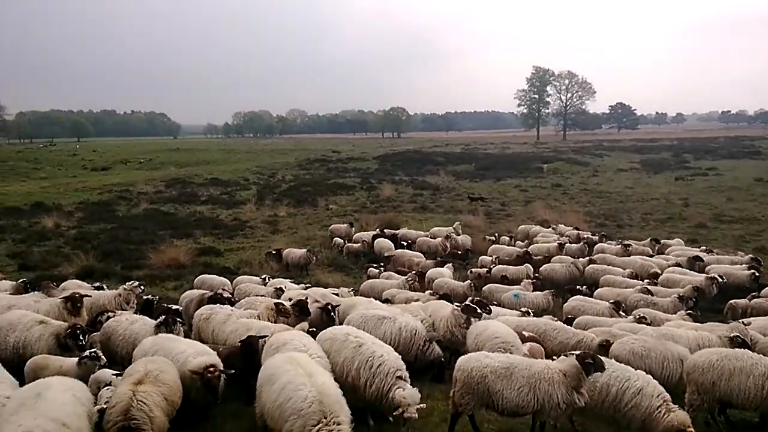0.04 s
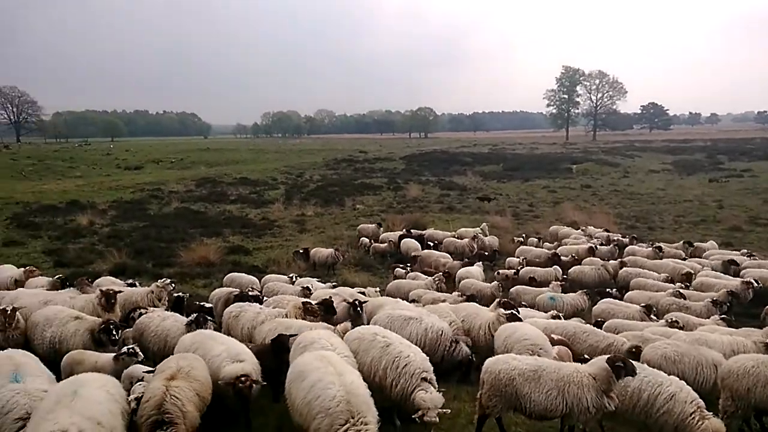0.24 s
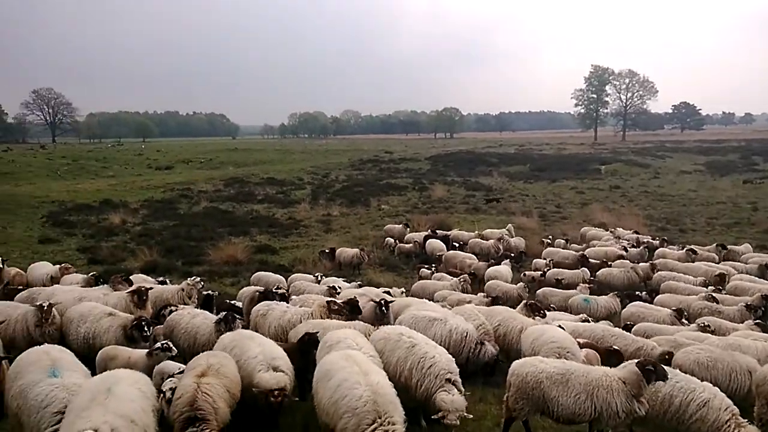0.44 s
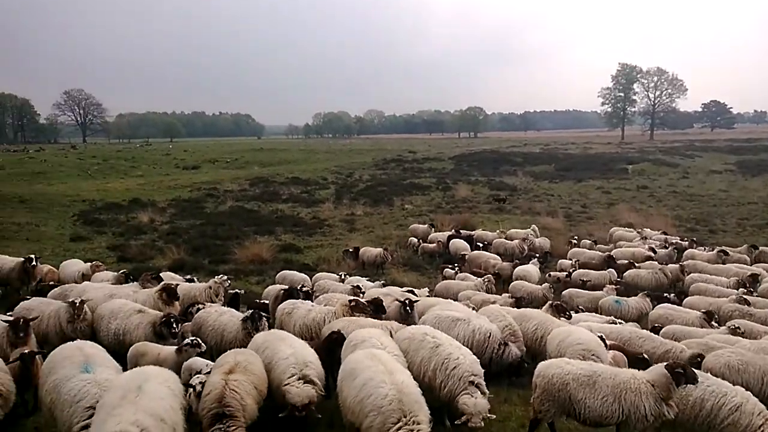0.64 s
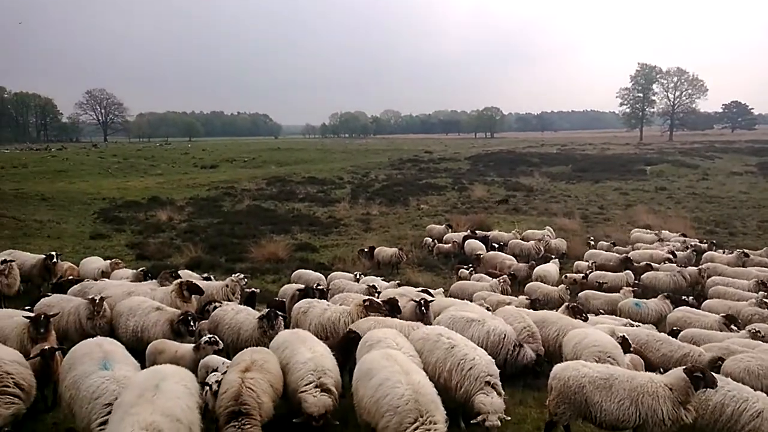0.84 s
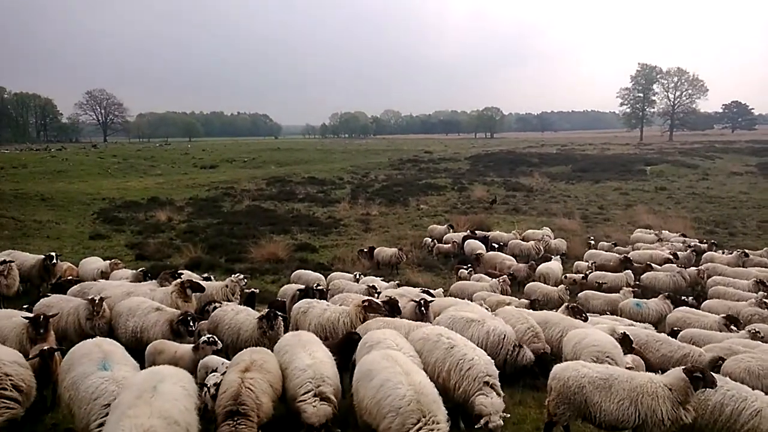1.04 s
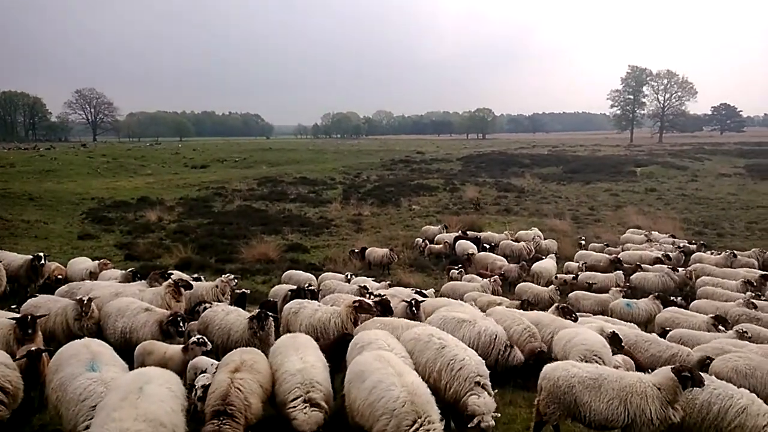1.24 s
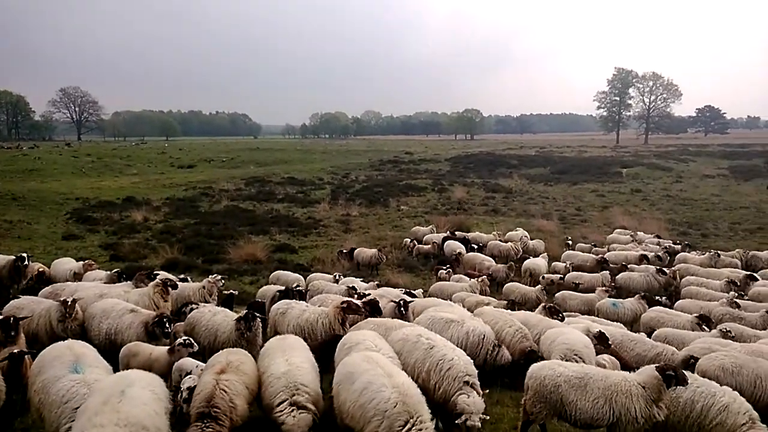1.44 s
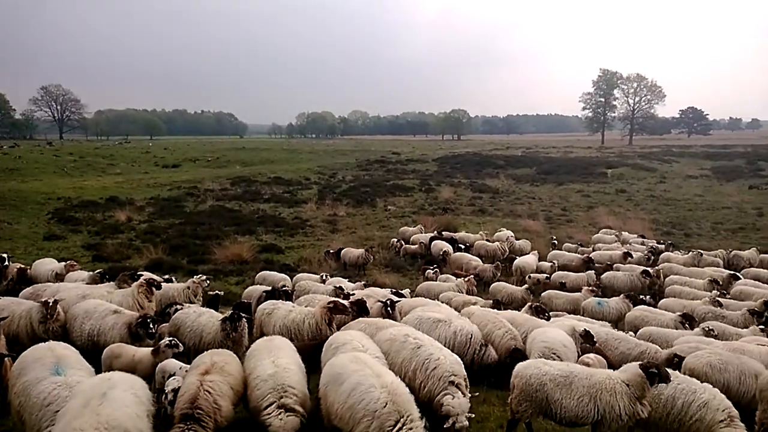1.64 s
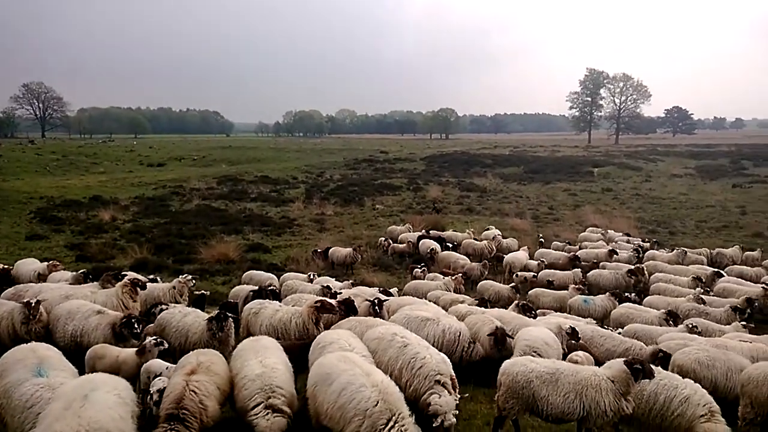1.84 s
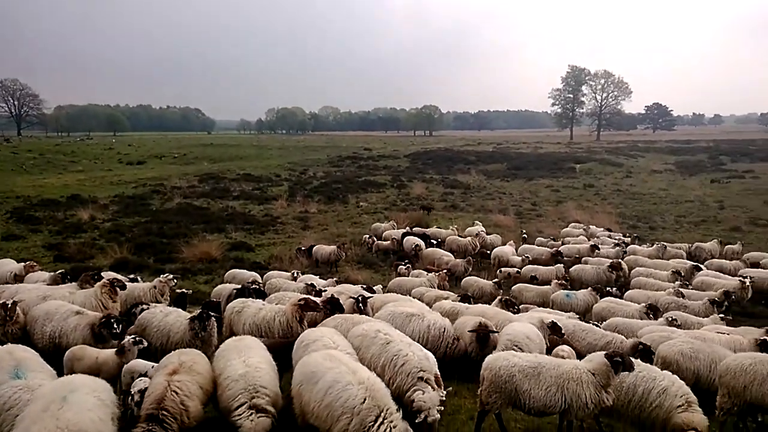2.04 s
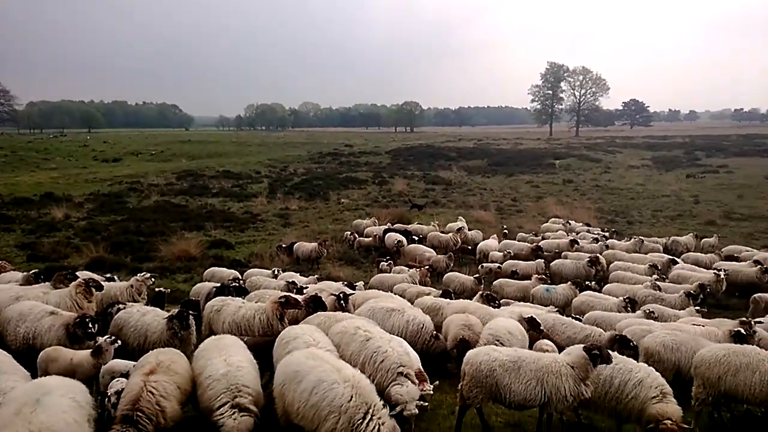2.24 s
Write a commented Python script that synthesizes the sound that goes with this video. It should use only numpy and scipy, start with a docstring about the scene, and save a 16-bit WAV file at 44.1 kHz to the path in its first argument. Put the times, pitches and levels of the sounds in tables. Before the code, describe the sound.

A ewe and two lambs bleat over buffeting wind and faint birdsong.

```python
"""Wind rumbles and buffets the microphone on open grassland, while a small bird nearby repeats a
rising, warbling, falling phrase and others whistle further off. Then a ewe close by bleats in quick,
hoarse throbs, and two lambs hold clear, overlapping calls. Each sheep's voice is a row of harmonics
shaped by its throat; glottal snaps and puffs of air make the ewe rasp. Behind them lie faint bleats,
the blur of the distant flock and rustling grass."""
import sys
import numpy as np
from scipy import signal
from scipy.fft import rfft, irfft
from scipy.io import wavfile
from scipy.ndimage import uniform_filter1d

SR = 44100
rng = np.random.default_rng(int(sys.argv[2]) if len(sys.argv) > 2 else 0)


def bounce(signal):
    """Save signal as a 16-bit WAV file at the path given by the first command-line argument."""
    frames = np.transpose(np.atleast_2d(signal))
    limited = np.clip(frames, -1, 1)
    pcm = np.round(limited * 32767).astype(np.int16)
    wavfile.write(sys.argv[1], SR, pcm)


N = 101429
T = np.arange(N) / SR

# throbs of the near ewe (centre [s], length [s], pitch [Hz], voice level [dB], rasp level [dB])
EWE_THROBS = [(0.744, 0.033, 140, -84, -62), (0.819, 0.057, 145.3, -74, -55.5),
              (0.904, 0.029, 150.2, -49.5, -58), (0.945, 0.043, 149.3, -36, -44.5),
              (0.975, 0.024, 145.9, -36, -47.5), (1.038, 0.054, 149.6, -33, -43.5),
              (1.114, 0.049, 162.9, -36.5, -41), (1.195, .05, 161.2, -38, -41),
              (1.278, 0.0413, 156.2, -34, -41.5), (1.356, 0.039, 157.1, -34.5, -43),
              (1.442, 0.053, 152.1, -42, -43), (1.524, 0.043, 166.5, -46, -47.5),
              (1.593, .03, 160.3, -53, -61)]
# her throat, for the voiced tone and for the rasp (frequency [Hz], gain [dB])
EWE_VOICE_THROAT = [(150, -31), (320, -26), (470, -20.5), (580, 4.5), (660, 8), (770, -33), (950, -49),
                    (1300, -8.5), (1700, -28), (3000, -44)]
EWE_RASP_THROAT = [(300, -25.5), (600, 13.5), (850, 1.5), (1150, 0.5), (1400, 12), (1650, -4.5),
                   (2100, 2.5), (2650, -2.5), (3300, -19), (4600, -21.5), (6500, -40.5), (15000, -42)]
# the lambs' calls (time [s], pitch [Hz], level [dB])
FIRST_LAMB_CALL = [(.845, 355, -57.5), (.875, 389.3, -43.5), (.92, 408.5, -44.5), (.96, 430.7, -46.5),
                   (1.1, 449.6, -46), (1.35, 445.6, -46.5), (1.48, 434.8, -48.5), (1.59, 416, -44.5),
                   (1.665, 394, -44.5), (1.73, 379.6, -46.5), (1.755, 370, -57)]
SECOND_LAMB_CALL = [(1.19, 337.6, -66.5), (1.24, 334.1, -51.5), (1.41, 342.5, -46.5), (1.5, 346.8, -46),
                    (1.6, 360.4, -45.5), (1.7, 356.6, -44.5), (1.84, 351.4, -45), (1.925, 359.7, -45),
                    (2.06, 351.3, -45.5), (2.15, 347.3, -46.5), (2.3, 339, -48)]
# their throats and the air in their voices (frequency [Hz], gain [dB])
FIRST_LAMB_THROAT = [(400, -27), (880, -10.5), (1100, 14), (1380, 1.5), (1650, -17.5), (2200, -18.5),
                     (2900, -13), (3400, -38.5), (4300, -38), (6000, -37)]
SECOND_LAMB_THROAT = [(350, -22.5), (700, -3.5), (1060, 3), (1410, -3.5), (1770, 3.5), (2120, -3.5),
                      (2480, -15.5), (2900, -33.5), (3500, -24), (4250, -18.5), (4700, -24.5), (6000, -35)]
BREATH_COLOUR = [(500, -12), (1100, 1), (1800, 1), (2600, -11), (4000, -8), (7000, -22)]
# the near bird (top of rise [s], rise length [s], start pitch [Hz], rise level [dB], warble length [s],
# warble against rise [dB], wait from top to mid-fall [s], fall length [s], fall level [dB])
BIRD_PHRASES = [(-.08, 0.037, 4850, -62, .06, -5, 0.13, 0.079, -65.5),
                (0.197, .042, 4800, -62, 0.069, -2, 0.12, 0.12, -58.5),
                (0.466, 0.042, 4700, -55, 0.061, -5, 0.093, 0.1, -59.5),
                (.716, 0.057, 4610, -55.5, 0.067, -6.5, 0.085, 0.08, -60),
                (0.977, 0.087, 4230, -56.5, 0.06, -8.5, 0.078, .075, -61.5),
                (1.227, 0.081, 4260, -56.5, 0.045, -9, 0.078, 0.068, -63),
                (1.471, .068, 4270, -56, 0.052, -10.5, 0.085, 0.069, -61),
                (1.721, 0.094, 4120, -58, 0.064, -12.5, .076, 0.054, -58.5),
                (1.978, 0.063, 4220, -59.5, 0.058, -5, 0.076, .08, -63)]
# birds further off (start [s], length [s], first pitch [Hz], middle [Hz], last [Hz], level [dB])
FAR_WHISTLES = [(-.03, 0.056, 3300, 3186, 3060, -56), (0.09, 0.15, 3580, 3730, 3540, -76),
                (0.179, .065, 2500, 2430, 2260, -71), (0.28, 0.058, 3380, 3250, 3083, -63.5),
                (0.321, 0.13, 3520, 3720, 3830, -75), (0.494, 0.13, 3540, 3680, 3800, -70.5),
                (0.742, .08, 3150, 3630, 4960, -71), (2.215, 0.038, 4300, 3610, 3010, -71),
                (2.18, 0.19, 4450, 4430, 4380, -75)]
# wind at the microphone (time [s], level [dB])
WIND_LEVEL = [(0, -46.5), (.04, -32.5), (.1, -45), (.2, -35.5), (.3, -28.5), (.38, -29), (.45, -29.5),
              (.55, -30), (.68, -28.5), (.77, -35.5), (.92, -31), (1.05, -26), (1.14, -32), (1.33, -36.5),
              (1.44, -29.5), (1.57, -32.5), (1.66, -40.5), (1.78, -34.5), (1.93, -39), (2.07, -37.5),
              (2.16, -44.5), (2.23, -56), (2.3, -61)]
# eddies striking it (time [s], length [s], level [dB], tilt from 50 to 800 Hz [dB/octave])
WIND_BUFFETS = [(0.237, 0.011, -18, 5.5), (0.256, 0.014, -18, 1.5), (0.271, 0.0057, -17, 2),
                (0.29, 0.028, -13.5, -0.5), (0.308, 0.029, -11.5, 1), (0.343, 0.02, -23, 2.5),
                (0.403, 0.0084, -16.5, 1.5), (0.489, 0.02, -12.5, -6.5), (0.514, 0.015, -25.5, 1),
                (0.543, 0.011, -12.5, 2.5), (0.565, 0.02, -16, -6), (.633, 0.0058, -12, -12.5),
                (1.165, 0.0127, -20.5, -5.5), (1.726, 0.016, -23, 3), (1.789, 0.041, -27.5, 0.5),
                (1.86, 0.019, -39.5, 2.5), (1.967, 0.017, -29.5, -2), (2.021, .016, -14.5, -0.5),
                (2.051, 0.041, -26.5, -4)]
# colours of the rumble and of a buffet (frequency [Hz], gain [dB])
RUMBLE_COLOUR = [(20, -5), (45, -1.5), (80, 5), (110, -4.5), (160, -13.5), (250, -25.5), (400, -43.5),
                 (800, -56.5), (2000, -68.5)]
BUFFET_COLOUR = [(20, -16), (45, 3.5), (80, 4), (130, -3.5), (200, -9), (320, -19.5), (500, -36.5),
                 (800, -57), (1500, -75), (4000, -98)]
# sheep further back (centre [s], length [s], pitch [Hz], level [dB])
FAR_SHEEP_BLEATS = [(0.1495, 0.3, 338, -61.5), (.885, 0.0317, 462, -51.5), (.79, .09, 340, -71)]
# their throat (frequency [Hz], gain [dB])
FAR_SHEEP_THROAT = [(300, -13.5), (470, -5), (680, -12.5), (900, 0.5), (1050, 1.5), (1350, -15),
                    (2000, -13.5), (2600, -16), (4000, -26)]
# blur of the distant flock (time [s], level [dB])
FLOCK_LEVEL = [(0, -59), (.25, -63), (.36, -67), (.65, -69.5), (.85, -61.5), (1.5, -65.5), (2.1, -60.5),
               (2.3, -61.5)]
# grass stirring under the flock (centre [s], length [s], level [dB])
GRASS_RUSTLES = [(1.03, 0.14, -63.5), (.435, .03, -67)]
# colours of the flock, the grass and the background hiss (frequency [Hz], gain [dB])
FLOCK_BLUR_COLOUR = [(300, 5), (600, 2), (820, -2.5), (1020, 1.5), (1300, -8.5), (1900, -3.5), (2600, -6.5),
                     (3100, -10.5), (4200, -13.5), (6500, -18)]
GRASS_COLOUR = [(1000, 3), (5000, 2), (9000, -5), (12000, -5), (15500, -2)]
HISS_COLOUR = [(100, 14), (400, -1), (1000, -20), (3000, 3), (5000, 8.5), (7000, -17), (15000, 5.5)]


def ewe():
    """Close by, a low voice arches in pitch with each throb; glottal snaps and puffs of air rasp in it."""
    centres, lengths, hz, voice_db, rasp_db = np.array(EWE_THROBS).T
    sag, jitter, linger_s, puff_decay_cycles = .05, .0125, .054, .58

    def effort(levels_db, linger_db, widths, edge):
        """The throbs, with a little sound lingering between them."""
        throbs = [undb(db) * np.maximum(swell(s, w, edge), undb(linger_db) * swell(s, w + linger_s, edge))
                  for s, w, db in zip(centres, widths, levels_db)]
        return np.max(throbs, axis=0)

    arch = np.max([swell(s, length) for s, length in zip(centres, lengths)], axis=0)
    pitch = np.interp(T, centres, hz) * (1 - sag * (1 - arch)) * (1 + jitter * waver(199))
    tone, cycles = voice(pitch, EWE_VOICE_THROAT, count=11)
    snaps = np.diff(np.floor(cycles), prepend=0) * undb(3 * waver(270))  # one a cycle, uneven
    puffs = rng.standard_normal(N) * np.exp(-(cycles % 1) / puff_decay_cycles)
    rasp = colour(scatter(unit(snaps) + .5 * unit(puffs), wet_db=0, t60=.036), EWE_RASP_THROAT)
    tone *= effort(voice_db, linger_db=-13, widths=lengths, edge=8.3)
    rasp *= effort(rasp_db, linger_db=-11.5, widths=lengths * 1.01, edge=2.2)  # swells more gently
    return tone + rasp


def lamb(call, throat, shimmer_db, jitter):
    """A clear, held call with a little air in it, dulled at the end as the mouth closes."""
    times, hz, db = np.array(call).T
    closing_s, breath_db = .22, -22.5
    pitch = uniform_filter1d(np.interp(T, times, hz), SR // 40) * (1 + jitter * waver(110))
    closing = np.clip(1 - (times[-1] - T) / closing_s, 0, 1)
    tone, _ = voice(pitch, throat, count=13, tilt_db_per_khz=-2 * closing)
    breath = undb(breath_db) * noise(BREATH_COLOUR)
    level_db = np.interp(T, times, db, left=-120, right=-120) + shimmer_db * waver(90)
    return (tone + breath) * undb(level_db)


def voice(hz, throat, count, tilt_db_per_khz=0):
    """Harmonics weighted by a sheep's throat, the higher wavering more; also the phase in cycles."""
    flicker_db_per_khz = .72
    cycles = np.cumsum(hz) / SR
    tone = power = 0
    for k in range(1, count + 1):
        khz = k * hz / 1e3
        gain = gain_at(k * hz, throat) * undb(tilt_db_per_khz * khz)
        flicker = undb(flicker_db_per_khz * khz * waver(22))
        tone += gain * flicker * np.sin(2 * np.pi * (k * cycles + rng.random()))
        power += gain ** 2 / 2
    return tone / np.sqrt(power), cycles


def near_bird():
    """A pure tone sweeps up, warbles through three fading arches and slides down."""
    rise_hz, fall_from_hz, fall_to_hz = 1183, 4880, 2573
    foot_hz, arch_hz, climb_hz = 4800, 1444, 770
    out = np.zeros(N)
    for top, rise_s, start_hz, db, warble_s, warble_db, wait, fall_s, fall_db in BIRD_PHRASES:
        u = progress(rise_s)
        out += note(top - rise_s, start_hz + rise_hz * u ** 2.11, undb(db) * np.sin(np.pi * u ** 1.97))
        u = progress(warble_s)
        warble_hz = foot_hz + arch_hz * np.abs(np.sin(3 * np.pi * u)) + climb_hz * u
        out += note(top, warble_hz, undb(db + warble_db - 10 * u) * dome(u ** .5))
        u = progress(fall_s)
        fall_hz = fall_from_hz * (fall_to_hz / fall_from_hz) ** u
        out += note(top + wait - fall_s / 2, fall_hz, undb(fall_db - 16 * np.abs(2 * u - 1)) * dome(u))
    return out


def wind():
    """Gusts rumble; each eddy striking the microphone is a pressure thump in a burst of turbulence."""
    rumble = noise(RUMBLE_COLOUR)
    rumble /= np.sqrt(uniform_filter1d(rumble ** 2, SR // 10))  # evened out, so the gusts set the level
    out = rumble * undb(np.interp(T, *np.array(WIND_LEVEL).T))
    for s, length, db, tilt in WIND_BUFFETS:
        shape = swell(s, length)
        thump = undb(-2) * colour(signal.unit_impulse(N, int(s * SR)), BUFFET_COLOUR, tilt)
        turbulence = unit(noise(BUFFET_COLOUR, tilt) * shape)
        out += undb(db) * unit(turbulence + thump) * np.sqrt(np.mean(shape ** 2))
    return out


def far_birds():
    """Thin whistles from further off, each gliding through three pitches."""
    out = np.zeros(N)
    for start, length, first, middle, last, db in FAR_WHISTLES:
        u = progress(length)
        glide = np.polyfit([0, .5, 1], [first, middle, last], 2)
        out += note(start, np.polyval(glide, u), undb(db) * dome(u))
    return out


def far_sheep():
    """Faint, rough bleats from the back of the flock, arching in pitch."""
    sag, jitter, shimmer_db = .05, .035, 3
    out = np.zeros(N)
    for centre, length, hz, db in FAR_SHEEP_BLEATS:
        pitch = hz * (1 - sag * (1 - swell(centre, length))) * (1 + jitter * waver(250))
        tone, _ = voice(pitch, FAR_SHEEP_THROAT, count=8)
        out += tone * undb(db + shimmer_db * waver(150)) * swell(centre, length, edge=4)
    return out


def pasture():
    """The bed of the field: the blur of the distant flock, rustling grass and a faint, even hiss."""
    flock = noise(FLOCK_BLUR_COLOUR) * undb(np.interp(T, *np.array(FLOCK_LEVEL).T) + 2.3 * waver(25))
    rustles = sum(undb(db) * swell(centre, length) for centre, length, db in GRASS_RUSTLES)
    grass = noise(GRASS_COLOUR) * undb(2 * waver(200)) * rustles
    return flock + grass + undb(-76) * noise(HISS_COLOUR)


def scatter(x, wet_db, t60):
    """Add diffuse reflections that die by 60 dB in t60 seconds."""
    tail = rng.standard_normal(N) * np.exp(-np.log(1000) * T / t60)
    return x + undb(wet_db) * signal.fftconvolve(x, tail / np.sqrt(np.sum(tail ** 2)))[:N]


def undb(db):
    """Decibels to gain."""
    return 10 ** (np.asarray(db) / 20)


def unit(x):
    """Scale to rms 1."""
    return x / np.sqrt(np.mean(x ** 2) + 1e-20)


def gain_at(hz, curve):
    """Gain along a (frequency [Hz], gain [dB]) curve."""
    f, db = np.array(curve, float).T
    return undb(np.interp(np.log(np.maximum(hz, 1)), np.log(f), db))


def colour(x, curve, tilt=0):
    """Filter by a curve, tilted in dB per octave from 50 to 800 Hz; rms 1."""
    hz = np.maximum(np.arange(N // 2 + 1) * SR / N, 1)
    slope = undb(tilt * np.log2(np.clip(hz, 50, 800)))
    return unit(irfft(rfft(x) * gain_at(hz, curve) * slope, N))


def noise(curve, tilt=0):
    """Coloured noise, rms 1."""
    return colour(rng.standard_normal(N), curve, tilt)


def waver(rate):
    """Smooth random drift that changes about rate times a second; rms 1."""
    width = max(int(SR / rate), 1)
    return unit(uniform_filter1d(uniform_filter1d(rng.standard_normal(N), width), width))


def swell(centre, length, edge=2):
    """A rounded rise and fall; a higher edge steepens its flanks."""
    return np.exp(-np.abs(2 * (T - centre) / length) ** edge / 2)


def progress(length):
    """0 to 1 over a note."""
    return np.linspace(0, 1, int(length * SR))


def dome(u):
    """A broad arch, silent at both ends of a note."""
    return np.sqrt(np.abs(np.sin(np.pi * u)))


def note(start, hz, gain):
    """A gliding pure tone placed in time."""
    tone = np.sqrt(2) * gain * np.sin(2 * np.pi * np.cumsum(hz) / SR)
    return np.interp(T, start + np.arange(len(hz)) / SR, tone, left=0, right=0)


def scene():
    """One microphone in the wind; the calls reach it with a little scatter off ground and flock."""
    lambs = lamb(FIRST_LAMB_CALL, FIRST_LAMB_THROAT, shimmer_db=.1, jitter=.0038)
    lambs += lamb(SECOND_LAMB_CALL, SECOND_LAMB_THROAT, shimmer_db=.12, jitter=.00065)
    sheep = scatter(ewe() + lambs + far_sheep(), wet_db=-24.5, t60=.4)
    song = (near_bird() + far_birds()) * undb(1.5 * waver(140))  # the level flutters
    birds = scatter(song, wet_db=-14, t60=.25)
    return (sheep + birds + wind() + pasture())[None]


def record(dry):
    """The recorder cuts the top above 15750 Hz."""
    return signal.sosfilt(signal.ellip(10, .2, 80, 15750, fs=SR, output="sos"), dry)


dry = scene()
out = record(dry)
bounce(out)
```